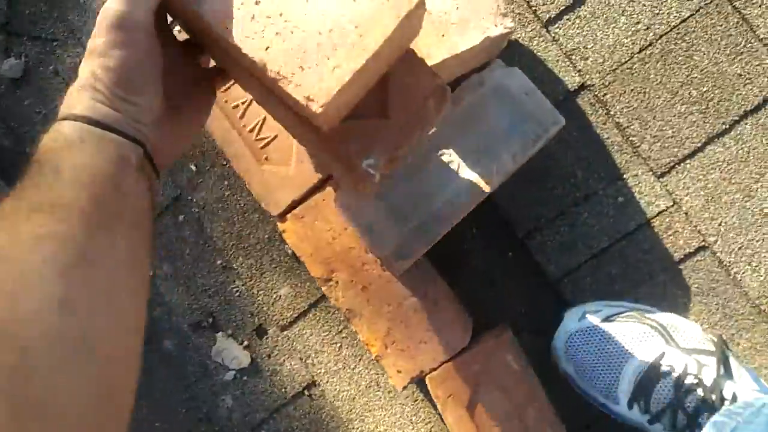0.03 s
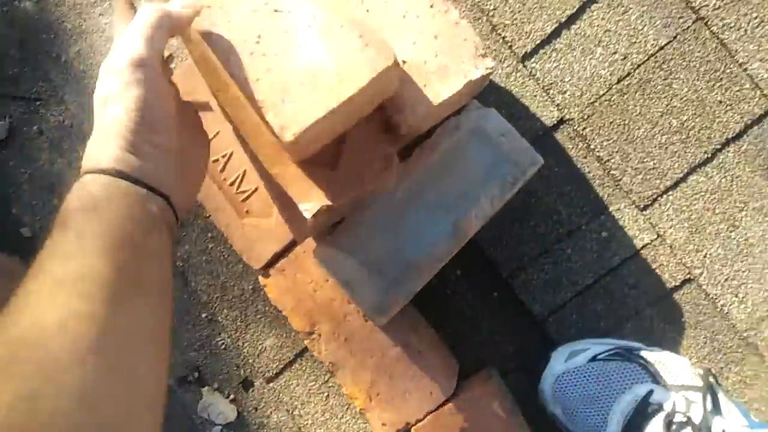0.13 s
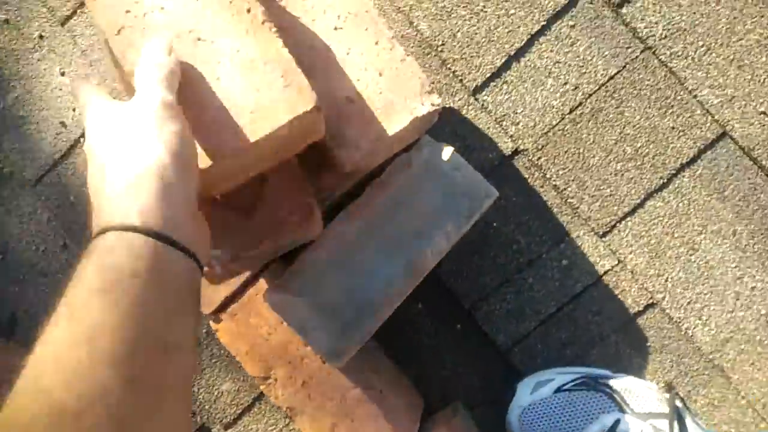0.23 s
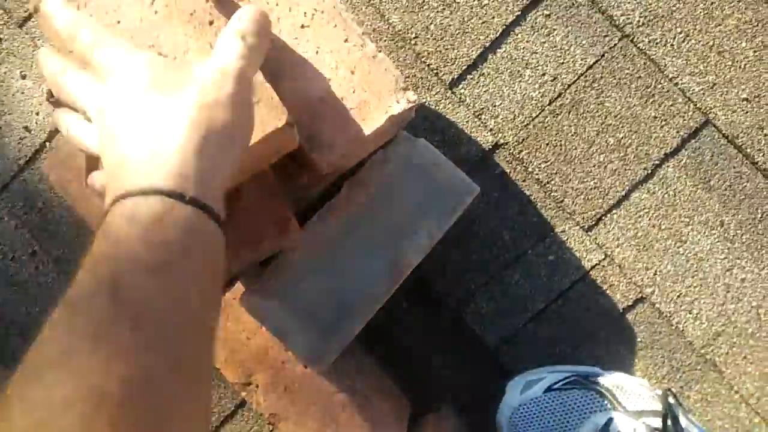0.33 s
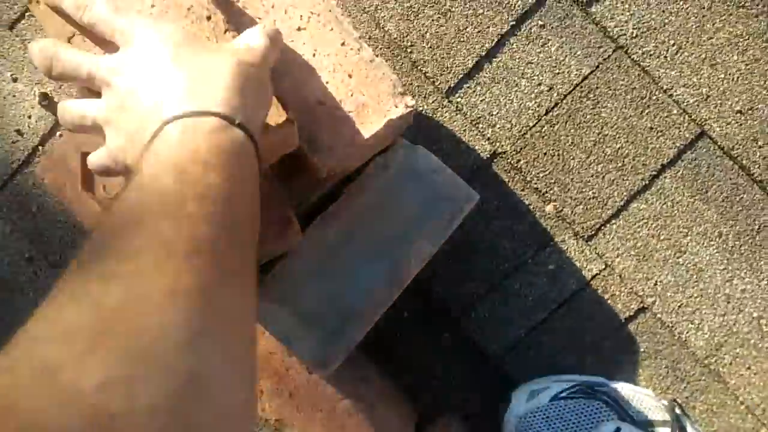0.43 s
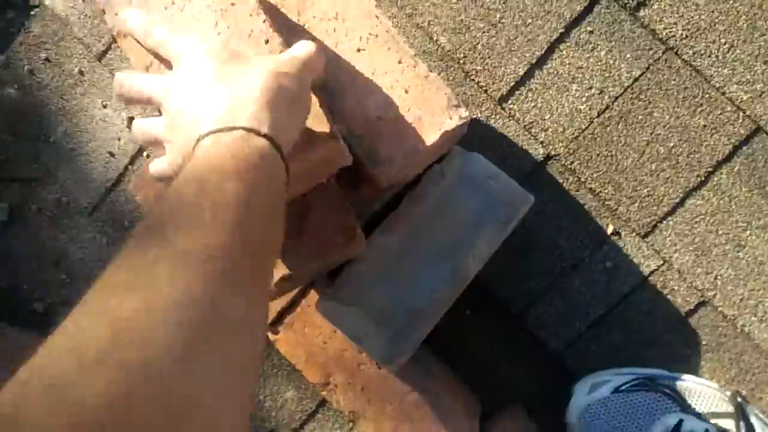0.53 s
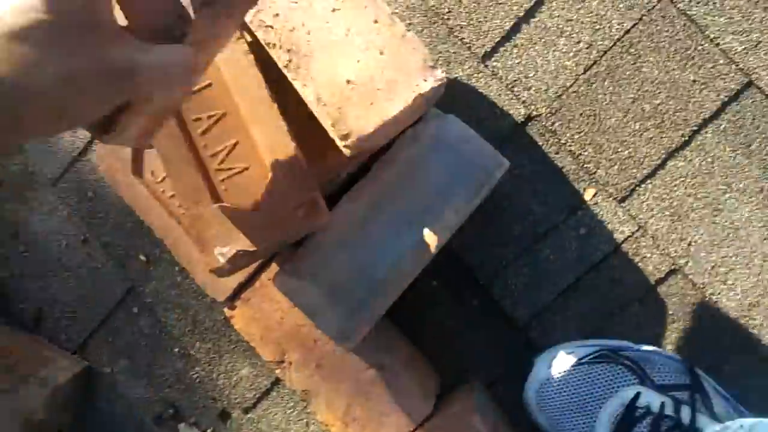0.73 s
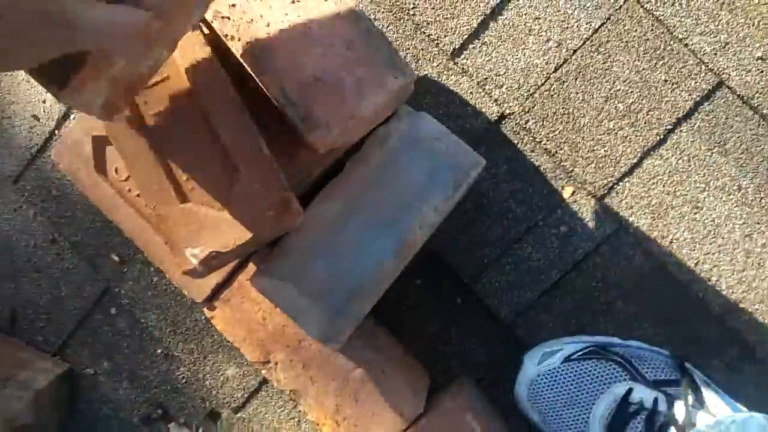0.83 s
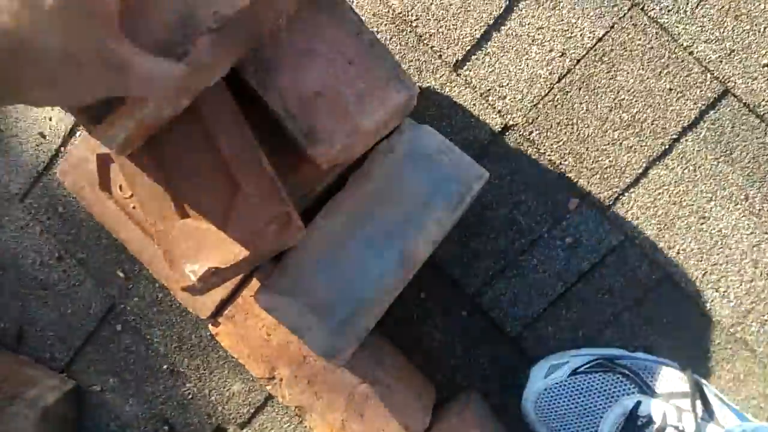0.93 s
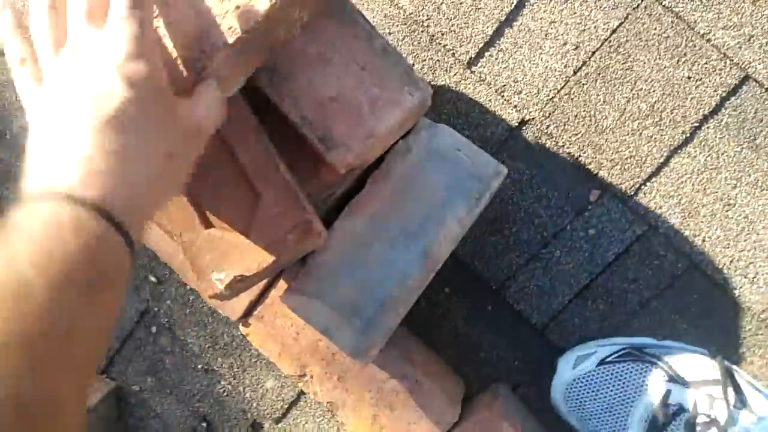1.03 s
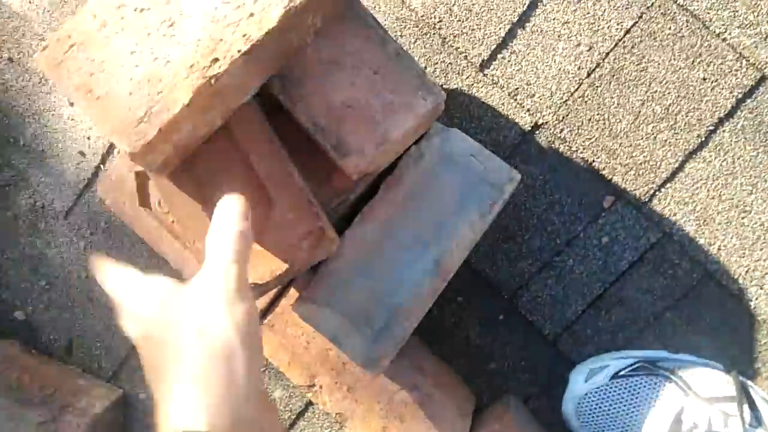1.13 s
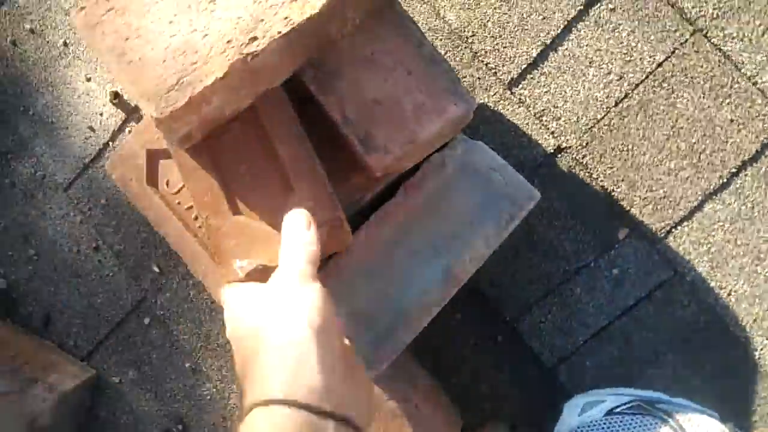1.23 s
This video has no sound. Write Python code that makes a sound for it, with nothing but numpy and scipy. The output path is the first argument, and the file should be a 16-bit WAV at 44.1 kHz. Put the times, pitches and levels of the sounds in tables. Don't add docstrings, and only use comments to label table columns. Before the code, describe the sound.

Two sharp overloaded brick knocks, with small grit ticks, light rubbing and soft thuds outdoors

```python
import sys
import numpy as np
from scipy import signal
from scipy.fft import rfft, irfft
from scipy.io import wavfile

SR = 44100
rng = np.random.default_rng(int(sys.argv[2]) if len(sys.argv) > 2 else 0)


def boost_factor(decibels):
    exponent = np.asarray(decibels, float) / 20
    return 10 ** exponent


def materialize(psi):
    bounded = np.clip(np.atleast_2d(psi).T, -1, 1)
    quanta = np.round(bounded * 32767).astype(np.int16)
    wavfile.write(sys.argv[1], SR, quanta)


N = 57330


def rms_one(x):
    return x / np.sqrt(np.mean(x ** 2) + 1e-20)


def coloured(x, points):
    hz, db = np.transpose(points)
    f = np.arange(N // 2 + 1) * SR / N + 1
    curve_db = np.interp(np.log(f), np.log(hz), db, left=-80, right=-80)
    return rms_one(irfft(rfft(x) * boost_factor(curve_db), N))


def filtered(x, order, hz, kind):
    return signal.sosfilt(signal.butter(order, hz, kind, fs=SR, output="sos"), x)


def ring(clicks, hz, t60):
    r = boost_factor(-60 / (max(t60, 1e-3) * SR))
    w = 2 * np.pi * hz / SR
    return signal.lfilter([0, np.sin(w)], [1, -2 * r * np.cos(w), r * r], clicks + 1e-18)


def add(out, s, sound):
    i = int(s * SR)
    out[i:i + len(sound)] += sound[:N - i]


def burst(noise, t60):
    return noise * boost_factor(-60 * np.arange(len(noise)) / SR / t60)


def clacks():
    # (start_s, peak_db, pitch_hz, t60_s)
    contacts = [(0.1576, -19.5, 990, 0.012), (.184, -17, 890, 0.022), (.194, -19, 920, 0.012),
                (0.2045, 13, 1301, 0.018), (0.2105, 12.5, 1431, 0.025), (0.2143, 17.5, 1392, 0.03),
                (0.2213, 14, 1460, 0.026), (.2275, 2.5, 1060, 0.011), (0.2359, 4, 1160, 0.011),
                (0.2383, 6, 1200, 0.0091), (.243, -10.5, 1100, 0.014), (0.262, -22, 1000, 0.039),
                (0.281, -10.5, 1050, 0.015), (0.298, -20.5, 767, 0.02), (.382, -34, 667, 0.038),
                (.393, -25.5, 756, 0.032), (0.4429, -12.5, 1158, 0.034), (0.4508, -16, 810, 0.025),
                (0.461, -16, 700, 0.0061), (0.5384, -15, 952, 0.022), (0.5429, -13.5, 675, 0.0063),
                (0.6558, -20.5, 722, 0.022), (0.6578, -21.5, 895, 0.018), (0.9408, -7, 1790, 0.0064),
                (0.9426, -17.5, 1700, 0.013), (0.9904, 9.5, 1301, 0.013), (0.9938, 3.5, 1245, 0.022),
                (1.001, 4, 1284, 0.02), (1.0109, 15.5, 1404, 0.023), (1.035, -8.5, 1003, 0.021),
                (1.117, -35.5, 2323, 0.026), (.274, -30, 990, 0.01), (.428, -36, 710, 0.025),
                (.514, -31, 1000, 0.013), (0.566, -37, 1197, .012), (.597, -25.5, 1318, 0.0095),
                (0.611, -34.5, 1402, 0.01), (.647, -29, 1730, .015), (0.16, -34.5, 426, 0.043)]
    # (ratio to its pitch, level_db, share of its t60)
    partials = [(1.0, 2.5, 0.73), (.8, -4, 0.95), (.6, -9, 1.02), (1.25, -5, 0.64), (1.55, -16, 0.44),
                (0.3537, -14, 1), (.17, -19, 1.1)]
    swell_s, soft_swell = 0.00041, 0.2
    choke = 1.45
    crack_db, crack_t60_s, crack_low_hz = -30.5, 0.0021, 2500
    out = np.zeros(N)
    t = np.arange(4000) / SR
    chance = rng.standard_normal((len(contacts), 8))
    cracks = filtered(rng.standard_normal((len(contacts), 2000)), 2, crack_low_hz, "high")
    for (s, db, hz, t60), detunes, crack in zip(contacts, chance, cracks):
        swell = 1 - np.exp(-t / (swell_s * boost_factor(-soft_swell * db)))
        body = 0
        for (ratio, part_db, share), detune in zip(partials, detunes):
            decay = boost_factor(part_db - 60 * (t / (t60 * share)) ** choke)
            part_hz = hz * ratio * (1 + 0.031 * detune)
            body = body + decay * np.sin(2 * np.pi * part_hz * t)
        add(out, s, -boost_factor(db - 2) * swell * body)
        add(out, s, boost_factor(db + crack_db) * burst(crack, crack_t60_s))
    return out


def clay(pitches, modes, hits):
    clicks = np.zeros(N)
    for s, db in hits:
        clicks[int(s * SR)] = boost_factor(db)
    out = np.zeros(N)
    for k, (hz, (db, t60)) in enumerate(zip(pitches, modes)):
        out += (-1) ** k * boost_factor(db) * ring(clicks, hz, t60)
    return out


def struck_bricks():
    laid_hz = [2762, 2988, 3125, 3335, 3750, 4167, 5817, 5943, 6551, 6670, 7475, 11200]
    free_hz = [2783, 2990, 3132, 3335, 3765, 3984, 4280, 5722, 5819, 6121, 6686]
    grazed_hz = [3122, 3328, 5749, 6681, 7483, 11630]
    # (level_db, t60_s)
    laid_modes = [(-9, 0.15), (-8, 0.04), (-13, 0.058), (-9, 0.24), (-3.5, 0.087), (-22, .2), (-26, 0.1),
                  (-23.5, 0.055), (-32, .16), (-25.5, .13), (-37, 0.17), (-58, .1)]
    free_modes = [(-6, 0.096), (1.5, 0.14), (-9, 0.14), (-36.5, 0.25), (-20.5, 0.13), (-29, 0.1),
                  (-25, .14), (-39, 0.23), (-39.5, .15), (-32, 0.092), (-35.5, 0.15)]
    grazed_modes = [(-16, 0.052), (-3, 0.096), (-14, 0.05), (-3, 0.21), (-21, 0.06), (-31.5, .03)]
    # (start_s, level_db)
    laid_hits = [
        (.221, -4),
        (.229, -2.5),
        (0.25, -17),
        (0.452, -44.5),
    ]
    free_hits = [
        (0.991, -6.5),
        (1.0106, 1.5),
    ]
    grazed_hits = [
        (0.159, -26),
        (0.186, -27.5),
    ]
    laid = clay(laid_hz, laid_modes, laid_hits)
    free = clay(free_hz, free_modes, free_hits)
    grazed = clay(grazed_hz, grazed_modes, grazed_hits)
    return laid + free + grazed


def catches():
    # (start_s, length_s, peak_db, pitch_hz, t60_s)
    tone_bursts = [(.158,.04,-40,2750,0.055),(.158,0.059,-37,2920,0.057),(.16,.04,-45,3130,.05),(.16,.02,-40,6000,.04),
                   (.2415,.003,-6.5,3010,.03),(.2495,.002,-8,2988,0.16),(.2495,.002,-29,3150,.13),(.243,.012,-33,5817,0.045),
                   (.288,0.011,-31,5800,.04),(.308,.012,-42,5800,.03),(.375,0.023,-41.5,3120,0.1),(.38,0.021,-45,3800,0.054),
                   (.42,.05,-41,2803,0.039),(.42,0.027,-39.5,5840,0.034),(.595,0.035,-41,5740,.04),(.59,0.065,-39,3755,.12),
                   (.6,.04,-40,2960,.08),(.605,0.031,-33,1460,.04),(.6,0.052,-51,2760,.1),(.65,.003,-35.5,2744,.22),(1.08,0.033,-54,3006,0.47),(1.118,0.029,-43,2450,.008),
                   (.89,0.044,-64,5460,.1),(.922,0.011,-51,1900,0.025),
                   (0.2049,0.0012,7,2040,0.019),(0.207,0.025,-0.5,2746,0.028),(0.376,0.036,-29,350,0.02),(0.597,.065,-40,11400,0.0019)]
    out = np.zeros(N)
    t = np.arange(9000) / SR
    noise = rng.standard_normal((len(tone_bursts), len(t)))
    for (s, length, db, hz, t60), n in zip(tone_bursts, noise):
        tone = ring(n * (t < length), hz, t60)
        add(out, s, boost_factor(db) * tone / np.abs(tone).max())
    return out


def thuds():
    # (start_s, peak_db, pitch_hz)
    pushes = [
        (0.211, -19, 168),
        (.262, -23.5, 128.5),
        (0.282, -29.5, 159),
        (0.388, -29.5, 159),
        (0.446, -24.5, 248),
        (0.537, -25.5, 207),
        (0.598, -31, 153),
        (.656, -25.5, 356),
    ]
    cycles = 17
    out = np.zeros(N)
    t = np.arange(6000) / SR
    for s, db, hz in pushes:
        decay = boost_factor(db - 60 * t * hz / cycles)
        swell = 1 - np.exp(-3 * t * hz)
        add(out, s, decay * swell * np.sin(2 * np.pi * hz * t))
    return out


def grit():
    # (start_s, peak_db, pitch_hz, air_db)
    ticks = [(.019,-39.5,5600,-22),(0.0256,-40,5600,-21),(.038,-42,5470,-1),(.046,-38,5140,-15),(0.0495,-31.5,5400,-22),
             (0.0635,-38,5830,-8),(0.07,-47,5800,-12),(.085,-45,5100,-5),(0.096,-46,5630,-4),(0.1132,-39,5130,-10),
             (.118,-26.5,5060,-5),(.183,-24,4400,-13),(.197,-28,4700,-6),(0.313,-32,4840,-19),(.333,-34.5,7000,-5),(0.368,-35,5560,-20),
             (.379,-36,5000,-2.5),(0.392,-37.5,7500,-1.5),(0.4419,-25,4430,-15.5),(.452,-33.5,5100,-13),(.514,-34,5900,-16),(0.52,-35.5,4500,-9),
             (.564,-40,5860,-26),(.579,-43,5500,-20),(.589,-40.5,5640,-14),(.615,-34,2300,-12),(0.648,-44.5,6050,-6),(0.815,-46.5,3280,-17),
             (.917,-46.5,9400,-1),(0.9377,-42,8000,-15),(0.94,-31.5,7840,-14),(0.944,-36,7600,-23),(.958,-44,2300,-19),(1.155,-53.5,6830,-18),
             (1.119,-40,4940,-25),(1.136,-41,2460,-29),(1.24,-41.5,2900,-28),(1.2755,-37.5,2500,-21.5),(1.2757,-47.5,6460,-17),
             (1.29,-38.5,7400,-14.5),(1.29,-42.5,2710,-17.5)]
    t60_s, air_low_hz = 0.011, 9800
    out = np.zeros(N)
    noise = rng.standard_normal((len(ticks), 800))
    for (s, db, hz, air_db), n in zip(ticks, noise):
        snap = burst(n, t60_s)
        pitched = filtered(snap, 2, [hz * 0.77, hz * 1.14], "band")
        air = filtered(snap, 4, air_low_hz, "high")
        add(out, s, boost_factor(db + 8.5) * (pitched + boost_factor(air_db) * air))
    return out


def rubbed_clay(grains, strength):
    # (pitch_hz, level_db, t60_s)
    modes = [(1620, -12, 0.026), (2760, -12, 0.08), (2960, -11, 0.079), (3687, -16.5, 0.1),
             (5730, -10, 0.04), (6800, -9.5, 0.022), (7590, -12, 0.047), (11450, -6.5, 0.0032),
             (13500, -8, 0.005), (3130, -14.5, 0.067)]
    patchy_db, patch_s = 5, 0.022
    patch = np.arange(N) / SR / patch_s
    catch = boost_factor(patchy_db * rng.standard_normal((len(modes), 200)))
    steady, shaped = np.zeros(N), np.zeros(N)
    for (hz, db, t60), heights in zip(modes, catch):
        grip = np.interp(patch, np.arange(200), heights)
        steady += boost_factor(db) * ring(grains * grip, hz, t60)
        shaped += boost_factor(db) * ring(strength * grains * grip, hz, t60)
    return shaped / np.sqrt(np.mean(steady ** 2))


def rubbing():
    # (time_s, grit_db, clay_db)
    stroke = [(0, -53, -68), (.1, -57.5, -63), (0.151, -48, -62), (.24, -38.5, -30.5), (.33, -46.5, -45),
              (.36, -58, -49.5), (.40, -47, -48.5), (.44, -59, -50), (.49, -56, -51), (0.579, -56, -59),
              (0.599, -45.5, -47.5), (0.651, -51.5, -41.5), (0.673, -55.5, -55.5), (0.759, -57.5, -70),
              (.93, -96, -80.5), (1.002, -42.5, -67), (1.129, -56.5, -67), (1.3, -71.5, -74)]
    # (pitch_hz, level_db per Hz)
    grit_colour = [(180, -57), (300, -14), (994, -9.5), (1460, -4), (1750, -15), (3030, -18.5), (4750, -15),
                   (5700, -21), (16000, -26.5)]
    grains_per_s, grain_spread_db = 2000, 5
    rumble_db, rumble_band_hz = -3, [110.8, 450]
    s, grit_db, clay_db = np.transpose(stroke)
    t = np.arange(N) / SR
    grit_level = boost_factor(np.interp(t, s, grit_db))
    clay_level = boost_factor(np.interp(t, s, clay_db))
    sizes = boost_factor(grain_spread_db * np.minimum(rng.exponential(1, N), 4)) * rng.choice([-1, 1], N)
    grains = sizes * (rng.random(N) < grains_per_s / SR)
    grains = grains + 1.3 * rng.standard_normal(N)
    rumble = rms_one(filtered(rng.standard_normal(N), 2, rumble_band_hz, "band"))
    direct = grit_level * coloured(grains, grit_colour)
    return direct + rubbed_clay(grains, clay_level) + boost_factor(rumble_db) * clay_level * rumble


def sliding_grit():
    # (pitch_hz, level_db per Hz)
    slide_colour = [(880, -33), (1500, -3.5), (2490, -2), (5220, -11.5), (6960, -1.5), (9190, -16.5),
                    (13800, -26), (16000, -37.5)]
    start_s, end_s, level_db, fall_db_per_s = 0.9375, 1, -44, 151
    t = np.arange(N) / SR
    fade = boost_factor(level_db - fall_db_per_s * np.maximum(t - start_s, 0))
    return (t > start_s) * (t < end_s) * fade * coloured(rng.standard_normal(N), slide_colour)


def with_echoes(near):
    # (delay_s, level_db)
    echoes = [(.0031, -20.5), (.0074, -26), (0.018, -32.5), (0.039, -51.5)]
    out = near.copy()
    dull = signal.lfilter([0.4], [1, -0.6], near)
    for s, db in echoes:
        add(out, s, boost_factor(db) * dull)
    return out


def outdoor_hum():
    # (pitch_hz, level_db per Hz)
    hum_colour = [(24, -31), (45, -16), (96, -3), (293, -6), (475, -19.5), (737, -15), (1890, -24),
                  (4760, -46.5), (6000, -39.5), (7800, -70), (13200, -120)]
    return boost_factor(-49) * coloured(rng.standard_normal(N), hum_colour)


def scene():
    near = clacks() + struck_bricks() + catches() + thuds() + grit()
    return (with_echoes(near) + rubbing() + sliding_grit() + outdoor_hum())[None]


def band_limit(x):
    return signal.sosfilt(signal.butter(12, 16460, fs=SR, output="sos"), x)


def record(dry):
    low_cut_hz, output_low_cut_hz, top_cut_hz = 150, 97, 16500
    ceiling, hardness = 0.8, 12
    x = filtered(dry, 2, low_cut_hz, "high")
    x = x / (1 + np.abs(x / ceiling) ** hardness) ** (1 / hardness)
    x = filtered(x, 1, output_low_cut_hz, "high")
    mix = signal.sosfiltfilt(signal.cheby2(12, 40, top_cut_hz, fs=SR, output="sos"), x)
    return band_limit(mix)


dry = scene()
out = record(dry)
materialize(out)
```